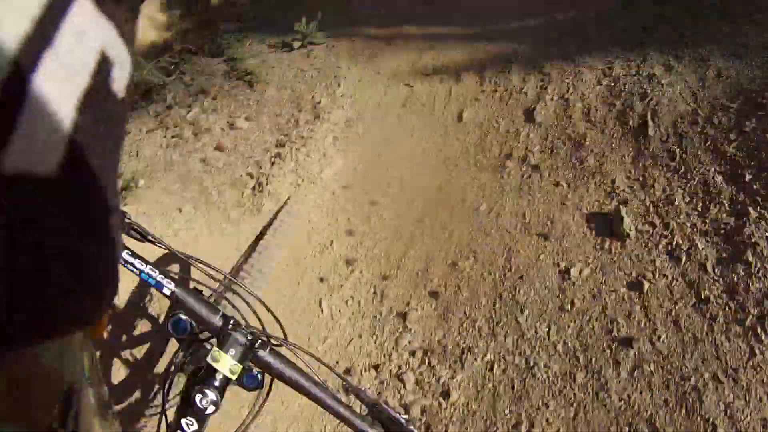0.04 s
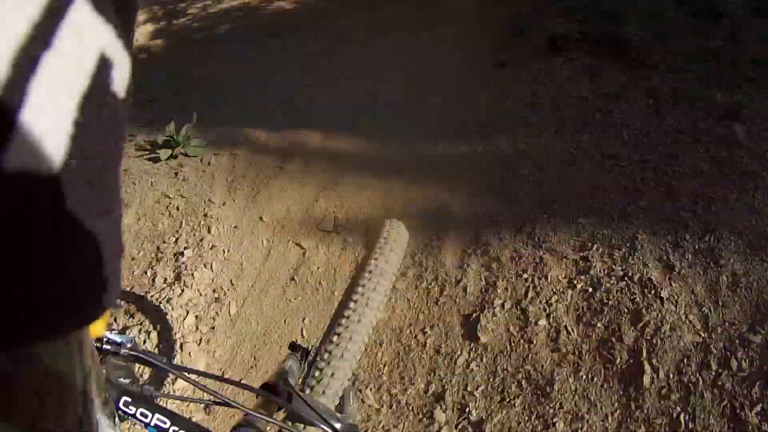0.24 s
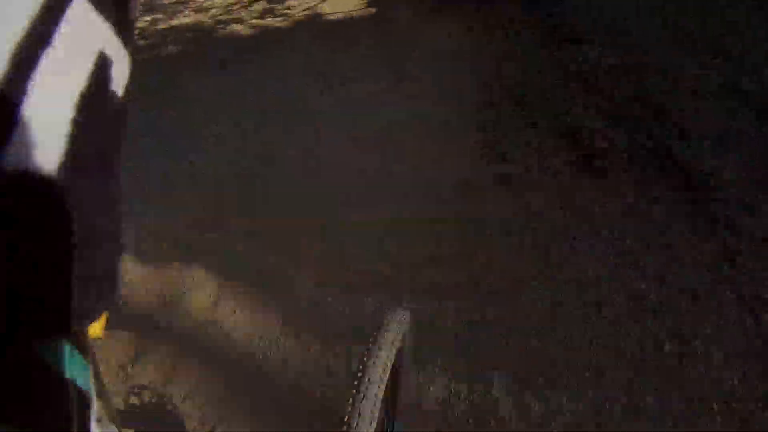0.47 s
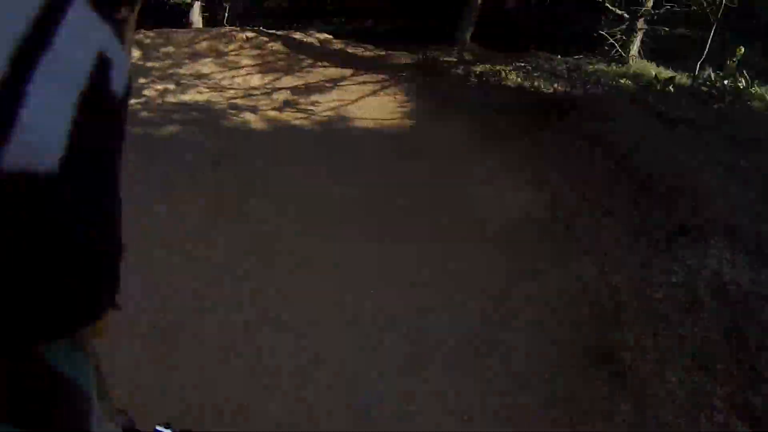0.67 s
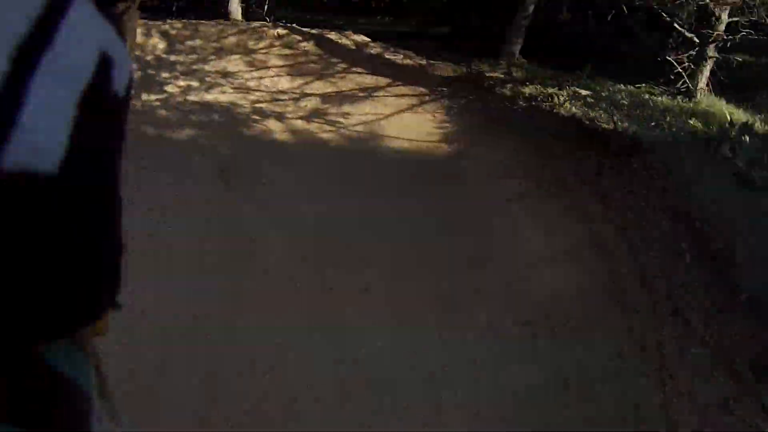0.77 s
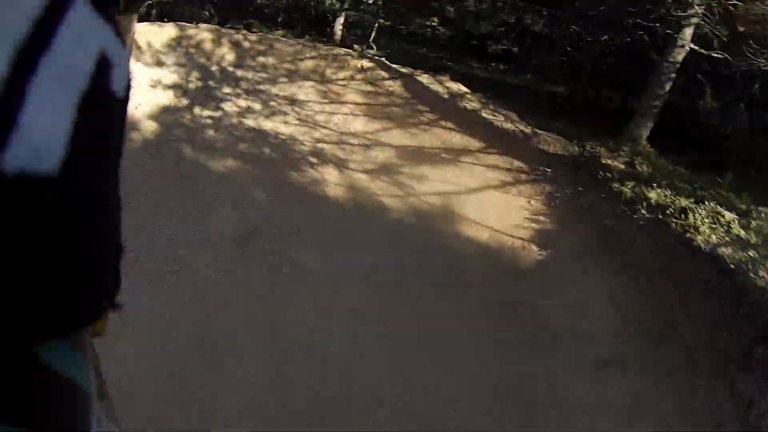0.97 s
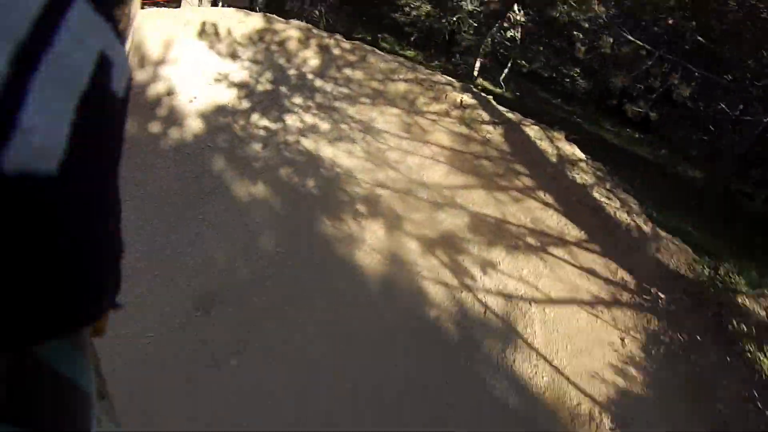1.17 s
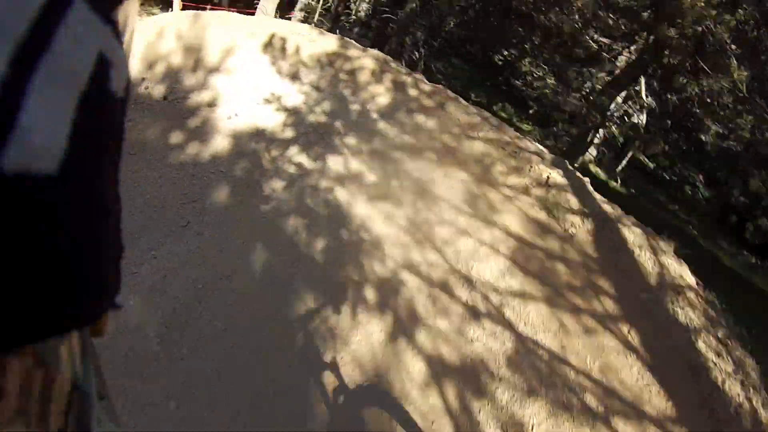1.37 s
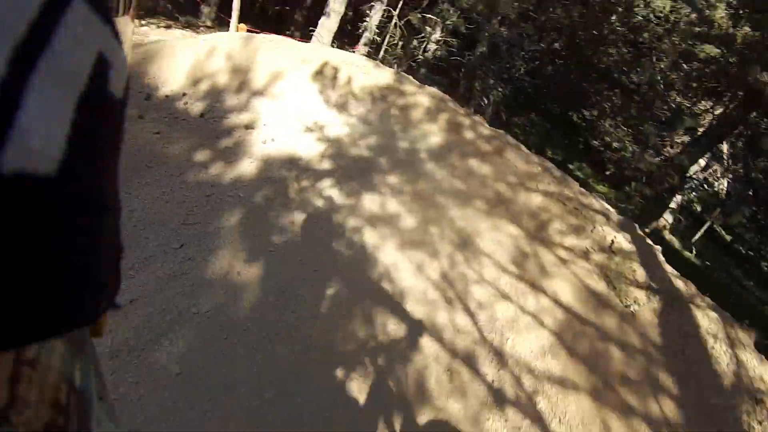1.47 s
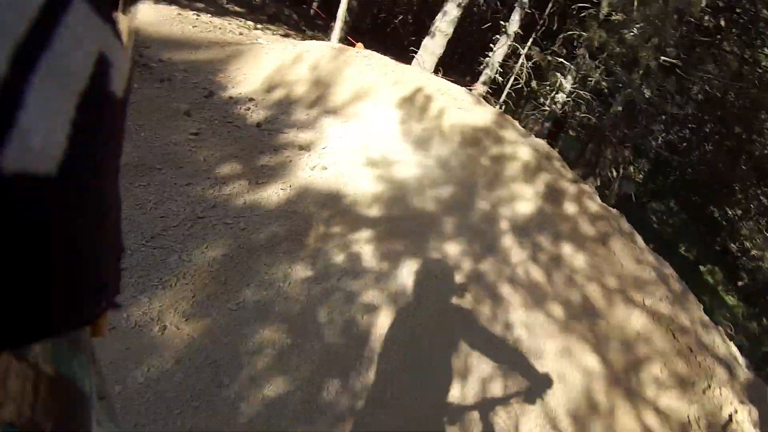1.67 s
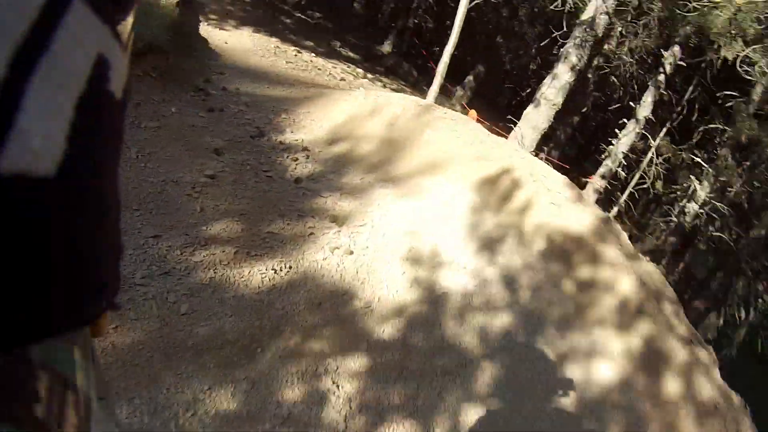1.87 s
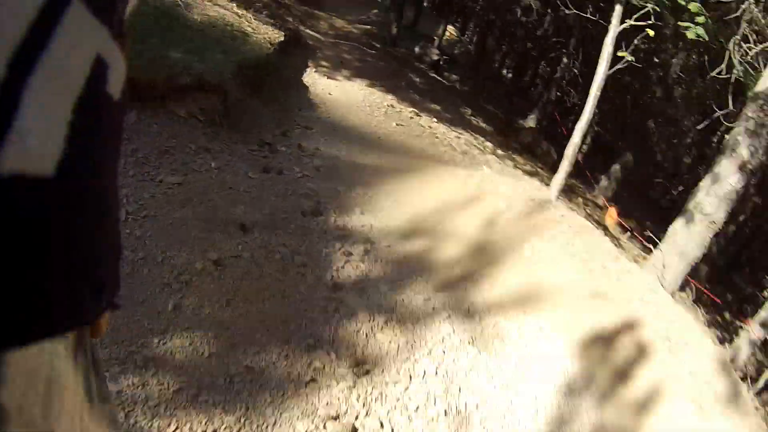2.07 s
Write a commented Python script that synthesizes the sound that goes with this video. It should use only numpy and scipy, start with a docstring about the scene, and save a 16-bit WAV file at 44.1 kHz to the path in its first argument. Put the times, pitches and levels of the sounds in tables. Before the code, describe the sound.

A mountain bike rolls down a gravel trail, heard from a closed camera case on the rider: deep fluttering bass, dull crunch, a cluster of sharp knocks and a thud, then smoother rolling with late clicks.

```python
"""A loose gravel trail under a rolling mountain bike, heard by a camera in a closed case strapped to the rider.
Wandering low tones with noise make the mount's sway and shake; low noise bands make wind and road rumble.
Banded random grains, coloured by the case, make the gravel crunch; gated noise makes a faint high hiss in
ragged bursts, with a brief swish at the start. Decaying sines make stone and part knocks, pings, one bump's
thud and a hollow tap; a short noise band makes a scrape."""
import sys
import numpy as np
from scipy import signal
from scipy.fft import rfft, irfft, next_fast_len
from scipy.io import wavfile
from scipy.ndimage import uniform_filter1d

SR = 44100
rng = np.random.default_rng(int(sys.argv[2]) if len(sys.argv) > 2 else 0)


def bounce(signal):
    """Save signal as a 16-bit WAV file at the path given by the first command-line argument."""
    frames = np.transpose(np.atleast_2d(signal))
    limited = np.clip(frames, -1, 1)
    pcm = np.round(limited * 32767).astype(np.int16)
    wavfile.write(sys.argv[1], SR, pcm)


N = 93933
t = np.arange(N) / SR
FFT_SIZE = next_fast_len(N, True)
f = np.arange(FFT_SIZE // 2 + 1) * SR / FFT_SIZE + 1e-3  # offset avoids zero Hz


def undb(db):
    """dB to gain."""
    return 10 ** (np.asarray(db) / 20)


def unit(x):
    """Scale to rms 1."""
    return x / np.sqrt(np.mean(x ** 2))


def noise():
    """White noise over the whole scene."""
    return rng.standard_normal(N)


def curve(table, col):
    """One column of a table, joined by straight lines in time."""
    table = np.array(table)
    return np.interp(t, table[:, 0], table[:, col])


def walk(rate_hz):
    """Random levels held 1 / rate_hz s, smoothed twice over that time; rms 1."""
    hold = max(int(SR / rate_hz), 2)
    steps = np.repeat(rng.standard_normal(N // hold + 1), hold)
    smooth = uniform_filter1d(uniform_filter1d(steps, hold), hold)
    return unit(smooth[:N])


def hump(x, hz, width_hz):
    """Gaussian band-pass."""
    gain = np.exp(-2 * ((f - hz) / width_hz) ** 2)
    return irfft(rfft(x, FFT_SIZE) * gain, FFT_SIZE)[:N]


def colour(x, points, lo_hz, hi_hz, peaks=()):
    """Shape by (Hz, dB) points and resonances, between soft band edges."""
    p = np.array(points)
    db = np.interp(np.log(f), np.log(p[:, 0]), p[:, 1])
    db = db + sum(lift_db / (1 + (2 * (f - hz) / width_hz) ** 2) for hz, width_hz, lift_db in peaks)
    edges = 1 / np.sqrt((1 + (lo_hz / f) ** 16) * (1 + (f / hi_hz) ** 16))
    return irfft(rfft(x, FFT_SIZE) * undb(db) * edges, FFT_SIZE)[:N]


CONTACT_S = .0004


def ring(start_s, modes):
    """Decaying sines struck at one moment, with a soft rise."""
    u = np.maximum(t - start_s, 0)
    rise = 1 - np.exp(-(u / CONTACT_S) ** 2)
    return rise * sum(undb(db) * np.sin(2 * np.pi * hz * u) * undb(-60 * u / t60_s) for hz, db, t60_s in modes)


def mount(table, noise_db, width_hz):
    """An oscillation of wandering pitch plus a noise band around it, at the table's rms level."""
    hz = curve(table, 1)
    phase = 2 * np.pi * (np.cumsum(hz) / SR + rng.random())
    tone = np.sqrt(2) * np.sin(phase)
    loose = unit(hump(noise(), np.mean(hz), width_hz))
    mix = (tone + undb(noise_db) * loose) / np.sqrt(1 + undb(noise_db) ** 2)
    return undb(curve(table, 2)) * mix


# Slow mount motion. Each row: time in seconds, pitch in Hz, level in dB.
SWAY_PATH = [(0.0, 29.5, -19), (0.08, 25.8, -16), (0.22, 25.3, -33), (0.24, 27, -27), (0.47, 26, -27.5),
             (0.51, 22.1, -14.5), (0.59, 27.6, -13), (0.68, 31, -38.5), (0.73, 30.3, -17.5),
             (0.83, 33, -24.5), (0.88, 27.7, -26), (1.07, 19.9, -51.5), (1.16, 17.1, -41.5),
             (1.21, 19.9, -24), (1.24, 18.4, -34.5), (1.31, 22.9, -38), (1.36, 21.2, -26),
             (1.49, 22.37, -31.5), (1.62, 28.1, -21), (1.72, 26.2, -40), (1.79, 28.4, -16),
             (1.85, 28.3, -21.5), (1.9, 24.5, -42.5), (2.0, 22, -18.5), (2.05, 23.4, -32),
             (2.13, 26.5, -20.5)]


def sway():
    """The mount swings slowly in the deep bass."""
    return mount(SWAY_PATH, noise_db=-4, width_hz=16.8)


# Quicker mount motion. Each row: time in seconds, pitch in Hz, level in dB.
SHAKE_PATH = [(0.0, 70, -12.5), (0.02, 69.6, -23.5), (0.21, 69.1, -41.5), (0.29, 70, -45),
              (0.36, 69.2, -44), (0.44, 71.2, -52), (0.58, 68.97, -25.5), (0.67, 69.8, -37),
              (0.7, 69.44, -25.5), (0.73, 69.4, -21.5), (0.79, 70.4, -38.5), (0.94, 69.05, -51),
              (0.98, 70.5, -65), (1.05, 71.78, -47), (1.35, 70.4, -54.5), (1.46, 70.1, -48),
              (1.52, 69.4, -54), (1.59, 71.18, -47), (1.66, 71.3, -59), (1.68, 71.82, -43.5),
              (1.77, 72.8, -47.5), (1.82, 71.2, -41), (1.87, 70.5, -42), (1.96, 70.06, -50),
              (2.08, 72, -33.5), (2.13, 70.55, -48)]


def shake():
    """The mount vibrates faster, near 70 Hz."""
    return mount(SHAKE_PATH, noise_db=-5, width_hz=16.4)


BUFFET_RE_SWAY_DB, BUFFET_FLOOR_DB = -26, -56


def buffet():
    """Wind noise between the two motions, rising with the sway above a floor."""
    wind = unit(hump(noise(), hz=45, width_hz=20.3))
    return wind * (undb(curve(SWAY_PATH, 2) + BUFFET_RE_SWAY_DB) + undb(BUFFET_FLOOR_DB))


# Wind and road rumble. Each row: time in seconds, lower part's level in dB, upper part's level in dB.
RUMBLE_LEVELS = [(.0, -45, -45), (.04, -54, -57), (.08, -41.5, -63), (.13, -55, -61), (.27, -51.5, -60.5),
                 (.42, -52, -57.5), (.47, -56.5, -64), (.55, -38.5, -51.5), (.63, -54, -59), (.7, -49, -56),
                 (.78, -43.5, -57), (.89, -56.5, -60), (1.05, -52.5, -50.5), (1.2, -56, -60.5),
                 (1.33, -53.5, -63), (1.43, -58, -63), (1.49, -48.5, -56), (1.57, -54, -62.5),
                 (1.65, -45, -62), (1.69, -41, -52), (1.75, -52, -63), (1.79, -43, -53.5),
                 (1.84, -50.5, -61), (1.92, -59.5, -62), (2.0, -49.5, -60.5), (2.11, -52, -62)]
# Rumble spectrum. Each row: frequency in Hz, gain in dB.
RUMBLE_SPECTRUM = [(85, -2), (100, -2), (140, 0.5), (180, -4.5), (220, -10.5), (330, -14)]
RUMBLE_BANDS_HZ = ((85, 195), (195, 330))
RUMBLE_FLICKER_DB, RUMBLE_FLICKER_HZ = 0.79, 13.68


def rumble():
    """Wind and road as two low noise bands that flicker independently."""
    parts = [unit(colour(noise(), RUMBLE_SPECTRUM, lo, hi)) for lo, hi in RUMBLE_BANDS_HZ]
    out = 0
    for col, part in enumerate(parts, start=1):
        flicker_db = RUMBLE_FLICKER_DB * walk(RUMBLE_FLICKER_HZ)
        out = out + part * undb(curve(RUMBLE_LEVELS, col) + flicker_db)
    return out


# Gravel crunch. Each row: time in seconds, mid level in dB, low level re mid in dB.
CRUNCH_LEVELS = [(0.02,-51,0.5), (0.08,-56.5,3.5), (0.14,-61,3.5), (0.2,-59.5,2), (0.27,-52.5,-0.5),
                 (0.40,-58.5,-0.5), (0.43,-52,-0.5), (0.479,-51.5,-1.5), (0.483,-45.5,-9),
                 (0.53,-47.5,-0.5), (0.61,-51.5,-7), (0.69,-50,0.5), (0.73,-54.5,1.5), (0.8,-49.5,-5),
                 (0.9,-49.5,-4), (1.0,-48,-8), (1.15,-51,-1.5), (1.3,-53.5,0), (1.41,-54.5,-0.5),
                 (1.47,-51.5,-1), (1.55,-56,1), (1.68,-53,-0.5), (1.8,-55,0.5), (1.92,-58,0),
                 (1.94,-51,-2.5), (1.955,-60.5,4.5), (2.0,-55,-1.5), (2.04,-58.5,2), (2.11,-51,-8.5)]
# Fine grit and spray. Each row: time in seconds, treble level in dB, top level re treble in dB.
GRIT_LEVELS = [(0.03,-58.5,-17), (0.1,-73.5,-0.5), (0.3,-70.5,-4), (0.4,-70.5,-2.5), (0.479,-67,-5.5),
               (0.484,-60.5,-4), (0.52,-57.5,-9), (0.535,-61,-13), (0.56,-67.5,-4), (0.66,-65,-9),
               (0.8,-68.5,-4), (0.9,-67,-6), (1.2,-67,-7), (1.5,-67,-6), (1.83,-71,-2.5), (2.07,-69.5,-3.5),
               (2.12,-65.5,-0.5)]
# Crunch spectrum through the case. Each row: frequency in Hz, gain in dB.
CRUNCH_SPECTRUM = [(280, 2.5), (400, -4), (500, -7.5), (700, -8.5), (850, -10), (1030, -13), (1660, -7.5),
                   (2120, -11.5), (2400, -8.5), (3400, -7), (3800, -20), (4500, -22), (6000, -24.5),
                   (7000, -31), (8500, -34.5), (10000, -39), (12000, -42.5), (15000, -50.5)]
# Case resonances. Each row: centre in Hz, width in Hz, lift in dB.
CASE_RESONANCES = [(424, 32, 5), (684, 180, 5.5), (814, 37, 4), (1780, 330, -1), (2320, 55, 7),
                   (3130, 120, 8), (3028, 190, -6.5), (4210, 160, 5), (4670, 140, 5.5), (5520, 250, 4),
                   (6280, 180, 4.5)]
GRAINS_PER_S, GRAIN_SPREAD_DB = 2500, 2
FLICKER_DB, FLICKER_HZ, SWELL_DB, SWELL_HZ = 1, 24.9, -0.75, 22


def crunch():
    """Dense uneven grains in half-octave bands that swell together and flicker independently."""
    edges_hz = 327 * 2 ** (np.arange(13) / 2)
    swell = walk(SWELL_HZ)
    shared = noise() * undb(GRAIN_SPREAD_DB * walk(GRAINS_PER_S / 10))
    groups = [0, 0, 0, 0]  # low, mid, treble, top
    for lo, hi in zip(edges_hz[:-1], edges_hz[1:]):
        hits = rng.random(N) < GRAINS_PER_S / SR
        size = undb(GRAIN_SPREAD_DB * rng.exponential(size=N)) * hits
        grains = 0.55 * unit(size * noise()) + 0.59 * unit(shared) + 0.51 * noise()
        band = colour(grains, CRUNCH_SPECTRUM, lo, hi, CASE_RESONANCES)
        band = band * undb(SWELL_DB * swell + FLICKER_DB * walk(FLICKER_HZ))
        groups[np.searchsorted([900, 3600, 7000], lo)] += band
    mid, treble = curve(CRUNCH_LEVELS, 1), curve(GRIT_LEVELS, 1)
    levels_db = (mid + curve(CRUNCH_LEVELS, 2), mid, treble, treble + curve(GRIT_LEVELS, 2))
    return sum(unit(group) * undb(db) for group, db in zip(groups, levels_db))


# Hiss bursts. Each row: start in seconds, peak level in dB, length in seconds.
HISS_BURSTS = [(0.0957, -70, 0.015), (0.1621, -68, 0.018), (0.2015, -76, 0.018), (0.3013, -69, 0.018),
               (0.3566, -65, 0.02), (0.4105, -71, 0.018), (0.4769, -56, 0.02), (0.5362, -59, 0.014),
               (0.5637, -59, 0.018), (0.6071, -70, 0.018), (0.635, -70, 0.018), (0.6714, -61, 0.021),
               (0.7363, -63, 0.018), (0.7687, -65, 0.018), (0.8031, -67, 0.018), (0.836, -62, 0.015),
               (0.874, -61, 0.018), (0.9039, -75, 0.018), (0.9353, -71, 0.018), (0.9702, -63, 0.017),
               (0.995, -69, 0.015), (1.0725, -57, 0.018), (1.1044, -73, 0.018), (1.125, -67, 0.018),
               (1.1427, -60, 0.018), (1.1698, -68, 0.017), (1.2047, -59, 0.018), (1.222, -58, 0.018),
               (1.2426, -67, 0.015), (1.2706, -56, 0.018), (1.3678, -61, 0.009), (1.4586, -60, 0.014),
               (1.496, -74, 0.018), (1.5763, -72, 0.018), (1.5998, -69, 0.018), (1.8073, -68, 0.018),
               (1.8303, -70, 0.019), (1.8996, -71, 0.021), (2.0004, -74, 0.018), (2.0913, -66, 0.018)]
HISS_STEADY_PEAK_DB, RAGGED_DB, RAGGED_HZ = -64.5, 2.6, 200


def hiss():
    """A narrow high noise band, steady underneath and stronger in ragged bursts."""
    gate = undb(HISS_STEADY_PEAK_DB)
    for start_s, db, length_s in HISS_BURSTS:
        gate = gate + undb(db) * (t > start_s) * (t < start_s + length_s)
    ragged = hump(noise(), hz=13370, width_hz=1400) * undb(RAGGED_DB * walk(RAGGED_HZ))
    ragged = ragged / np.quantile(np.abs(ragged), .999)  # near-peak 1
    return ragged * uniform_filter1d(gate, size=60)


# Airy swish. One row: centre in Hz, width in Hz, level in dB.
SWISH_BAND = (10600, 1800, -68.5)
SWISH_S = .055


def swish():
    """An airy noise band at the start that falls away steeply."""
    hz, width_hz, db = SWISH_BAND
    return unit(hump(noise(), hz, width_hz)) * undb(db) / (1 + (t / SWISH_S) ** 12)


# Stone and part knocks. Each row: start in seconds, ring level in dB, ring pitch in Hz, ring t60 in seconds,
# snap level in dB, crack level in dB, crack decay constant in seconds.
KNOCK_HITS = [(0.2222, -46, 1510, 0.022, -63, -68, 0.004), (0.3251, -48.5, 1390, 0.02, -45, -57, 0.0024),
              (0.417, -44, 1580, 0.022, -53, -62, 0.0046), (0.4817, -35, 2506, 0.038, -33, -48.5, 0.004),
              (0.5105, -39, 2470, 0.018, -41, -46.5, 0.0029), (0.5373, -38.5, 1572, 0.019, -39, -70, 0.004),
              (0.5484, -43.5, 2250, 0.051, -37.5, -44, 0.0026),
              (0.6457, -37, 2710, 0.011, -51, -53.5, 0.0057), (0.6996, -40.5, 2400, 0.03, -46, -53, 0.0043),
              (0.7257, -51, 1386, 0.022, -51, -55, 0.0035), (0.8079, -33, 2850, 0.023, -35, -52, 0.0032),
              (0.8594, -36, 2320, 0.018, -49, -59, 0.004), (0.915, -37.5, 2306, 0.022, -42, -71, 0.0031),
              (0.9383, -36, 2900, 0.022, -50, -81, 0.004), (1.4608, -39.5, 3347, 0.033, -60, -70, 0.0032),
              (1.4744, -39, 2400, 0.053, -48, -68, 0.004), (1.616, -43, 2310, 0.031, -46, -69, 0.004),
              (1.7424, -42, 1528, 0.02, -41, -56, 0.0025), (1.933, -42, 1529, 0.022, -45, -67, 0.004),
              (1.9642, -37, 2330, 0.024, -52, -75, 0.0037), (1.9986, -45, 1318, 0.022, -46, -64, 0.0036),
              (2.0273, -44, 1650, 0.021, -44, -65, 0.0034)]
# Crack spectrum. Each row: frequency in Hz, gain in dB.
CRACK_SPECTRUM = [(4000, 8), (6000, -6), (9000, -8), (12000, -17)]
SNAP_DECAY_S = 0.0014


def knocks():
    """Stones and parts knock: a short pitched ring, a dry snap and a gritty treble crack."""
    bright = unit(colour(noise(), CRACK_SPECTRUM, 4100, 13400))
    dull = unit(colour(noise(), CRUNCH_SPECTRUM, 1000, 3200, CASE_RESONANCES))
    out = np.zeros(N)
    for start_s, db, hz, t60_s, snap_db, crack_db, crack_s in KNOCK_HITS:
        u = np.maximum(t - start_s, 0)
        rise = 1 - np.exp(-u / CONTACT_S)
        snap = dull * undb(snap_db) * rise * np.exp(-u / SNAP_DECAY_S)
        crack = bright * undb(crack_db) * rise * np.exp(-u / crack_s)
        out += ring(start_s, [(hz, db, t60_s)]) + snap + crack
    return out


# Pebble pings. Each row: start in seconds, level in dB, pitch in Hz, t60 in seconds.
PEBBLE_PINGS = [(0.3249, -45.5, 5450, 0.019), (.646, -51, 4260, 0.025), (1.494, -54, 5600, 0.016),
                (1.742, -57, 4220, 0.013)]


def pings():
    """Pebbles ping as single small high decaying sines."""
    return sum(ring(start_s, [(hz, db, t60_s)]) for start_s, db, hz, t60_s in PEBBLE_PINGS)


# Bump. Each row: start in seconds, level in dB.
THUD_HITS = [(.686, -24)]
# Frame modes. Each row: pitch in Hz, relative level in dB, t60 in seconds.
FRAME_MODES = [(92, -10, .12), (119, 4.5, 0.099), (163, -4, 0.17), (233.4, -9.5, 0.098), (406, -8.5, 0.017),
               (680, -16, 0.05), (963, -16.5, 0.017)]


def thuds():
    """A bump thuds through the frame, ringing its modes together."""
    return sum(undb(db) * ring(start_s, FRAME_MODES) for start_s, db in THUD_HITS)


SCRAPE_START_S, SCRAPE_LENGTH_S = .76, .16
SCRAPE_DB, SCRAPE_GRAIN_DB, SCRAPE_GRAIN_HZ = -53, 2.88, 69


def scrape():
    """Grainy rubbing that swells and fades in a narrow band of the case."""
    progress = np.clip((t - SCRAPE_START_S) / SCRAPE_LENGTH_S, 0, 1)
    swell = np.sqrt(np.sin(np.pi * progress).clip(0))
    rub = unit(hump(noise(), hz=1710, width_hz=190))
    return rub * swell * undb(SCRAPE_DB + SCRAPE_GRAIN_DB * walk(SCRAPE_GRAIN_HZ))


# Hollow tap. Each row: start in seconds, level in dB.
TAP_HITS = [(1.9635, -30)]
# Tap modes. Each row: pitch in Hz, relative level in dB, t60 in seconds.
HOLLOW_MODES = [(791.6, 1, .032), (486, -8, 0.011), (640, -6.5, 0.014), (1390, -11, 0.014),
                (2320, -11, 0.016), (2800, -22, 0.018), (3600, -25, 0.009), (4700, -23, .012),
                (5600, -20.5, 0.013)]


def taps():
    """A hollow tap: short modes struck together."""
    return sum(undb(db) * ring(start_s, HOLLOW_MODES) for start_s, db in TAP_HITS)


def scene():
    """Everything reaches the one microphone inside the case."""
    low = sway() + shake() + buffet() + rumble()
    steady = crunch() + hiss() + swish()
    events = knocks() + pings() + thuds() + scrape() + taps()
    return (low + steady + events)[None]


def record(dry):
    """The camera cuts the top with a steep elliptic low-pass at 15250 Hz."""
    low_pass = signal.ellip(10, .2, 80, 15250, fs=SR, output="sos")  # order, ripple dB, stopband dB, Hz
    return signal.sosfilt(low_pass, dry)


dry = scene()
out = record(dry)
bounce(out)
```